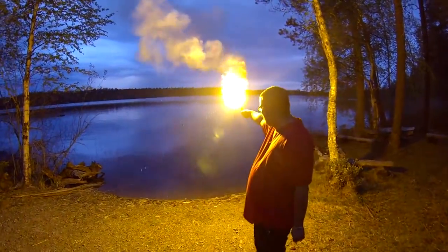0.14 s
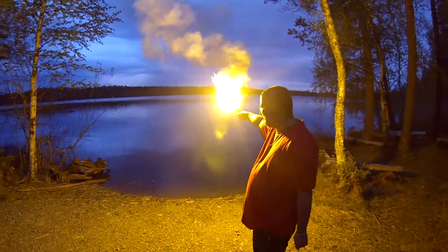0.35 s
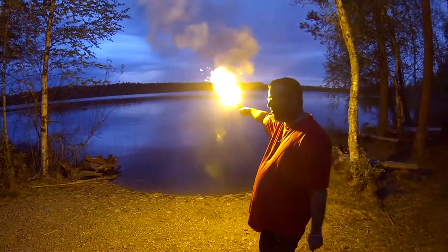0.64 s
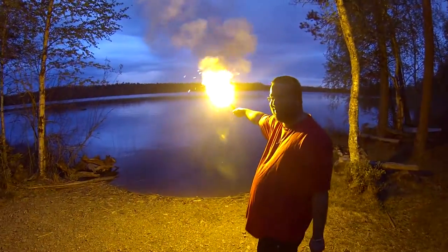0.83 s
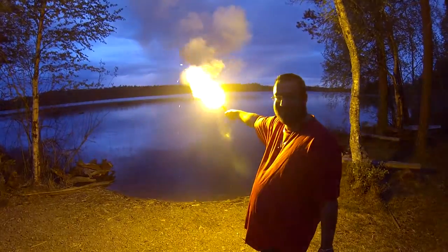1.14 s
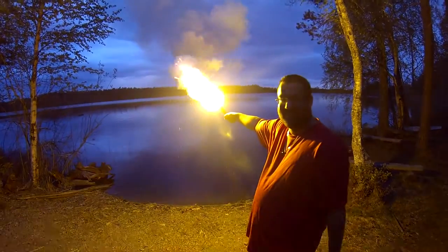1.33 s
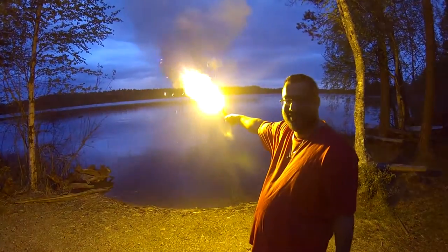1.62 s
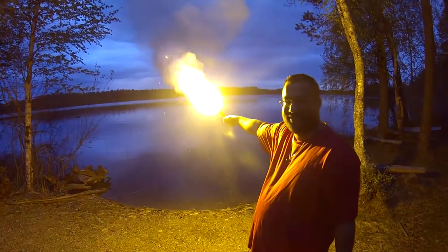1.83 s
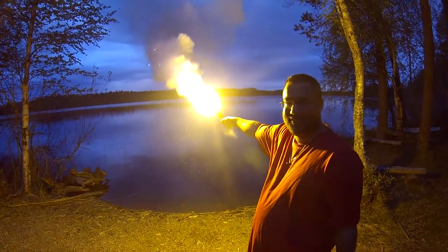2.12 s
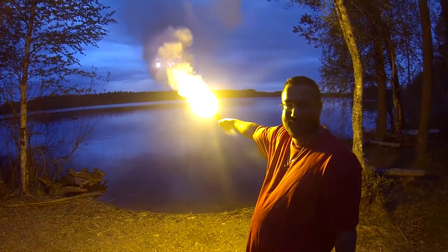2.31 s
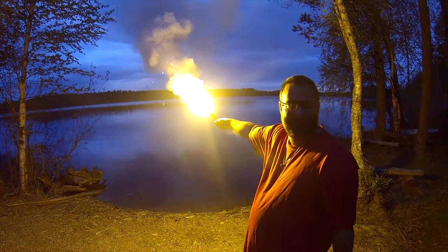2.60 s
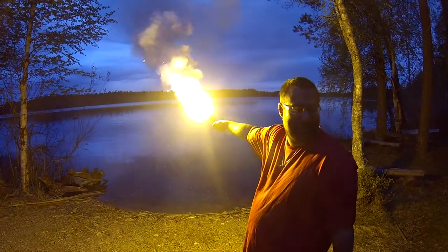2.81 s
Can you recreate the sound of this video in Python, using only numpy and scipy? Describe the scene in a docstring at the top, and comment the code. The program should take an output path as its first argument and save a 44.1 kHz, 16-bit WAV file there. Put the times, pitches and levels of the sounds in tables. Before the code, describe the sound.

A handheld flare burns continuously by a lake, a muffled rushing hiss with small spits and crackles; low rumble and dull handling thumps, strongest just after one second, come through a small enclosed camera microphone.

```python
"""By a lake at dusk a handheld flare burns, heard through the closed housing of a small camera.
The jet of flame is turbulent noise: it hisses, flutters and spits, and the housing's many resonances
colour it. Hand and air shake the camera, a low noise of uneven strength. Fingers bump its body,
whose modes ring as decaying sines. Its electronics whine faintly, as sines of wavering pitch."""
import sys
import numpy as np
from scipy import signal
from scipy.fft import rfft, irfft
from scipy.io import wavfile

SR = 44100
rng = np.random.default_rng(int(sys.argv[2]) if len(sys.argv) > 2 else 0)


def digitize_waveform(pressure):
    """Quantize a signal to 16-bit integers and store it at the path in sys.argv[1].

    Rows of a 2-D input are taken as channels; values are limited to [-1, 1].
    """
    field = np.atleast_2d(pressure).T
    bounded = np.clip(field, -1, 1)
    quanta = np.round(bounded * 32767).astype(np.int16)
    wavfile.write(sys.argv[1], SR, quanta)


def undo_db(level):
    """Turn decibels back into plain size, where 20 dB means ten times bigger."""
    steps = np.asarray(level, float) / 20
    return 10 ** steps


N = 130095


def in_time(rows):
    """Linear interpolation: the second column of a table, against time, for every sample."""
    return np.interp(np.arange(N) / SR, *np.transpose(rows))


def rms_one(x):
    """Normalization of power: scale x to unit rms."""
    return x / np.sqrt(np.mean(x ** 2) + 1e-20)


def colour(x, points):
    """Linear filtering: multiply the spectrum of x by a response, interpolated over log frequency."""
    hz, db = np.transpose(points)
    bin_hz = np.maximum(np.arange(N // 2 + 1) * SR / N, 1)
    gain_db = np.interp(np.log(bin_hz), np.log(hz), db)
    return irfft(rfft(x) * undo_db(gain_db), N)


def wander(rows):
    """Random modulation: a sum of low-passed noises, one for each (rate_hz, rms spread)."""
    settle = SR // 2  # samples in which the filter settles
    out = 0
    for rate_hz, spread in rows:
        pole = np.exp(-2 * np.pi * rate_hz / SR)
        noise = rng.standard_normal(N + settle)
        slow = signal.lfilter([1], [1, -2 * pole, pole * pole], noise)[settle:]
        out = out + spread * rms_one(slow - slow.mean())
    return out


def split(x, hz):
    """Complementary filtering: the parts below and above hz, which add up to x."""
    low = signal.sosfiltfilt(signal.butter(2, hz, fs=SR, output="sos"), x)
    return low, x - low


def random_clicks(per_s, floor_db, spread_db):
    """Poisson process: clicks at random moments, at floor_db plus a capped exponential spread."""
    level_db = floor_db + spread_db * np.minimum(rng.exponential(1, N), 3)
    return (rng.random(N) < per_s / SR) * undo_db(level_db)


def ring(clicks, hz, db, t60_s):
    """Damped resonance: each click sets a two-pole mode ringing as a decaying sine."""
    radius = undo_db(-60 / (t60_s * SR))
    angle = 2 * np.pi * hz / SR
    poles = [1, -2 * radius * np.cos(angle), radius * radius]
    return undo_db(db) * signal.lfilter([0, np.sin(angle)], poles, clicks + 1e-18)


def flare():
    """Jet turbulence: broadband noise modulated band by band, then filtered by the housing."""
    # level of the roar, the lowest part of the jet: time_s, level_db
    roar_level = [(0, -58), (.3, -57), (.7, -55.5), (.9, -55.5), (1.2, -55), (1.6, -55), (2.0, -54.5),
                  (2.5, -54.5), (2.95, -55)]
    # level of the hiss above the roar: time_s, level_db
    middle_level = [(0, -64.5), (.5, -63.5), (1.0, -63), (1.5, -63), (2.0, -63.5), (2.5, -63.5),
                    (2.95, -64)]
    # level of the top of the hiss: time_s, level_db
    top_level = [(0, -77.5), (.5, -77), (1.0, -76.5), (1.5, -74.5), (2.0, -70), (2.3, -79), (2.6, -72),
                 (2.95, -72.5)]
    # resonances of the housing, as a relative response: frequency_hz, level_db
    housing = [(150, -23), (250, -18), (400, -17), (700, -17), (800, -16.5), (950, -11), (1170, -18),
               (1340, -6), (1560, -18.5), (1700, -3), (1870, 2), (2000, -5.5), (2150, -4), (2400, -10),
               (2650, -19), (2900, -19), (3400, -14.5), (3800, -16), (4080, -27.5), (4250, -23),
               (4420, -25), (4800, -17), (5200, -24.5), (5750, -32), (5950, -25), (6550, -24.5),
               (6900, -28.5), (7200, -26.5), (7700, -27.5), (8050, -33), (8950, -31.5), (9400, -36.5),
               (9900, -33), (10250, -27), (10900, -28.5), (11500, -36), (12050, -31.5), (12350, -36.5),
               (12900, -30), (13500, -34), (14200, -34.5), (14750, -42), (15150, -37.5), (15300, -42)]
    # flutter of the flame, before each band's share: rate_hz, spread_db
    flutter = [(10, .35), (35, .8), (150, .8)]
    # bands of the jet: upper_edge_hz, share of the common flutter, share of its own flutter, crackle_db
    jet_bands = [(1500, 0.9, 0.5, -16), (2600, 0.17, 1.96, -34), (5600, 0.19, 1.36, 4),
                 (9400, 0.85, 0.53, -3), (20500, 0.97, 1.1, 3)]
    # clearest spits, against the hiss and before each band's crackle_db: start_s, level_db
    clear_spits = [(0.17, 11), (.494, 8), (1.116, 16), (1.339, 9), (1.589, -2), (1.619, 13.5), (1.754, -4),
                   (1.86, -4)]
    middle_from_hz, top_from_hz = 2700, 9400
    spit_decay_s = 0.00057  # time constant

    common_db = wander(flutter)
    starts = random_clicks(per_s=90, floor_db=-12, spread_db=5)
    start_s, spit_db = np.transpose(clear_spits)
    starts[(start_s * SR).astype(int)] = undo_db(spit_db)
    spits = signal.lfilter([1], [1, -np.exp(-1 / (spit_decay_s * SR))], starts)

    rest = rng.standard_normal(N)
    jet = 0
    for edge_hz, common, own, crackle_db in jet_bands:
        band, rest = split(rest, edge_hz)
        flutter_db = common * common_db + own * wander(flutter)
        jet = jet + band * undo_db(flutter_db) * (1 + undo_db(crackle_db) * spits)

    lower, top = split(colour(jet, housing), top_from_hz)
    roar, middle = split(lower, middle_from_hz)
    out = undo_db(in_time(roar_level)) * rms_one(roar)
    out = out + undo_db(in_time(middle_level)) * rms_one(middle)
    return out + undo_db(in_time(top_level)) * rms_one(top)


def rumble():
    """Random forcing: hand and air drive the camera with low noise of lumpy strength."""
    # level of the rumble: time_s, level_db
    shake = [(0.0, -40.5), (0.19, -38), (0.75, -44.5), (0.85, -44.5), (1.0, -40), (1.12, -37),
             (1.29, -44.5), (1.53, -40), (1.67, -41.5), (2.23, -47), (2.36, -44.5), (2.45, -45.5),
             (2.95, -43)]
    # relative spectrum of the rumble: frequency_hz, level_db
    spectrum = [(1.8, -29), (3.0, 2), (24, 2.5), (75, -15), (97, -20), (124, -23.5), (282, -35), (368, -33),
                (440, -42.5), (502, -38.5), (600, -46), (780, -70), (1320, -120)]
    # unevenness of the forcing: rate_hz, spread_db
    lumps = [(6, .7), (25, 1.3)]
    lumpy = rng.standard_normal(N) * undo_db(wander(lumps))
    return undo_db(in_time(shake)) * rms_one(colour(lumpy, spectrum))


def bumps():
    """Modal excitation: soft blows and lighter random touches ring the modes of the camera body."""
    # blows, as drive of each mode before softening: start_s, ring_db, upper_db, push_db, direction (sign)
    blows = [(.037, -41.5, -48, -30, 1), (0.0467, -30, -42, -42, 1), (0.051, -50, -69, -18.5, -1),
             (.086, -47, -54, -44, 1), (0.103, -40, -51, -28, 1), (0.205, -42, -55, -54, 1),
             (.334, -42, -67, -28, 1), (0.4726, -38, -37, -35, -1), (.481, -42, -43.5, -42, -1),
             (1.052, -36.5, -41, -26, -1), (1.0619, -23.5, -33, -24, -1), (1.0845, -32.5, -41.5, -20, 1),
             (1.172, -40, -50, -45, 1), (1.332, -50.5, -64, -31, 1), (1.5593, -31.5, -41.5, -23, -1),
             (1.576, -60, -48, -52, -1), (1.958, -49, -54, -55, 1), (2.058, -51, -45.5, -55, 1),
             (2.436, -36, -48, -27.5, 1)]
    # modes of the body, the low push, the main ring and the upper rings: frequency_hz, gain_db, t60_s
    push_mode = (47.7, 0, 0.066)
    ring_mode = (173.3, 0, 0.043)
    upper_modes = [(452, -0.5, 0.017), (515.5, -6.5, 0.017), (236, -3.5, 0.024)]
    contact_hz = 630  # low-pass of the contact
    touch_upper_db = -14  # light touches drive the upper modes less

    start_s, ring_db, upper_db, push_db, direction = np.transpose(blows)
    touches = random_clicks(per_s=30, floor_db=-60, spread_db=2) * rng.choice([-1, 1], N)
    driven = [(ring_mode, ring_db, 0), (push_mode, push_db, 0)]
    driven += [(mode, upper_db, touch_upper_db) for mode in upper_modes]
    out = np.zeros(N)
    for mode, blow_db, touch_db in driven:
        clicks = touches * undo_db(touch_db)
        clicks[(start_s * SR).astype(int)] = np.sign(direction) * undo_db(blow_db)
        # a one-pole low-pass at 1.5 times the mode's frequency softens the blow
        soft = np.exp(-3 * np.pi * mode[0] / SR)
        out += ring(signal.lfilter([1 - soft], [1, -soft], clicks), *mode)
    return signal.sosfilt(signal.butter(4, contact_hz, fs=SR, output="sos"), out)


def whine():
    """Frequency modulation: thin sines of the electronics, each wavering slightly in pitch."""
    # tones of the electronics: pitch_hz, level_db (rms)
    tones = [(10643, -86), (10691, -85), (12005, -100), (13189, -95)]
    out = 0
    for pitch_hz, level_db in tones:
        wavering_hz = pitch_hz + wander([(5.5, 2)])  # 5.5 Hz rate, 2 Hz rms spread
        phase = 2 * np.pi * np.cumsum(wavering_hz) / SR
        out = out + np.sqrt(2) * undo_db(level_db) * np.sin(phase)
    return out


def scene():
    """Linear superposition: all the sources add up in one channel."""
    return (flare() + rumble() + bumps() + whine())[None]


def low_pass(x):
    """Removes everything above the highest recorded frequency."""
    return signal.sosfilt(signal.butter(12, 15290, fs=SR, output="sos"), x)


def record(dry):
    """Unity gain: the finished mix goes out at its own level."""
    return low_pass(dry)


dry = scene()
out = record(dry)
digitize_waveform(out)
```